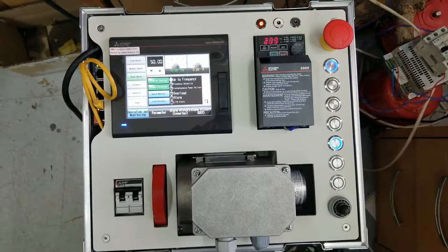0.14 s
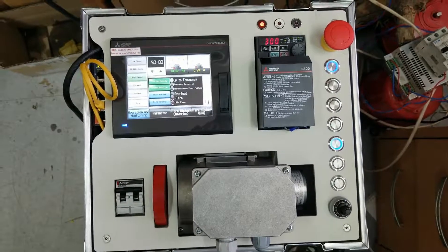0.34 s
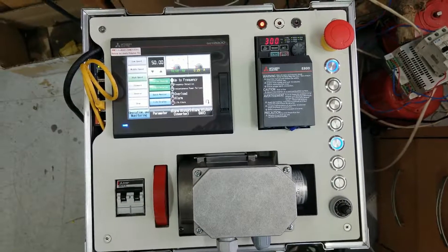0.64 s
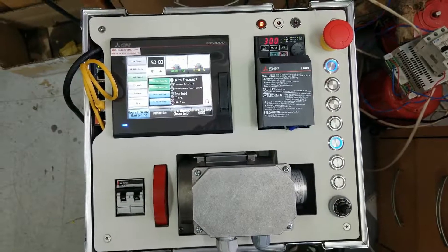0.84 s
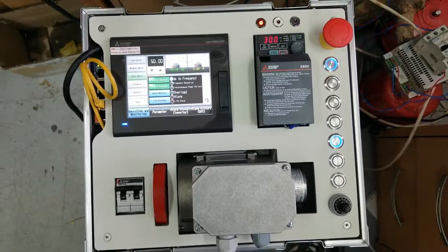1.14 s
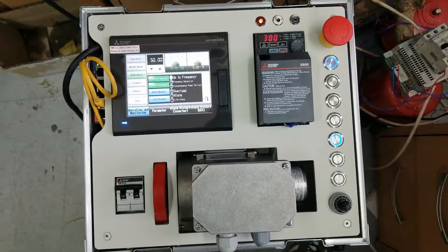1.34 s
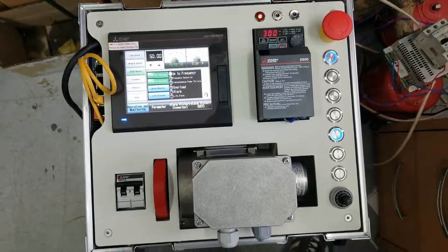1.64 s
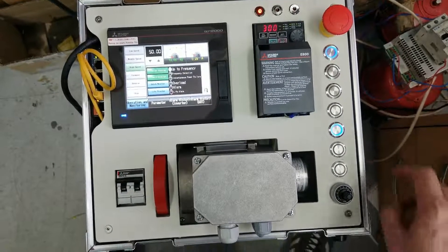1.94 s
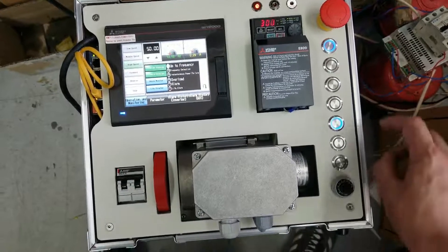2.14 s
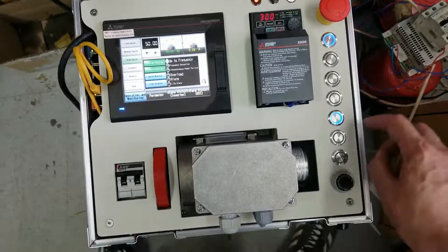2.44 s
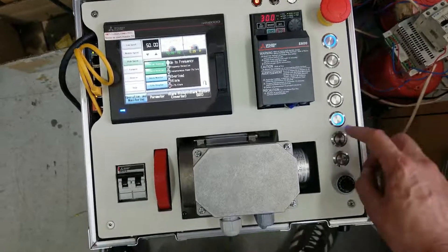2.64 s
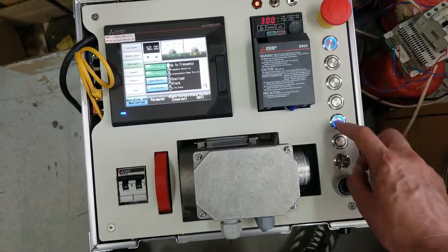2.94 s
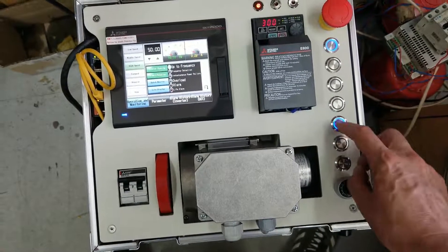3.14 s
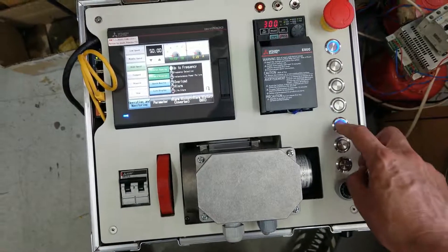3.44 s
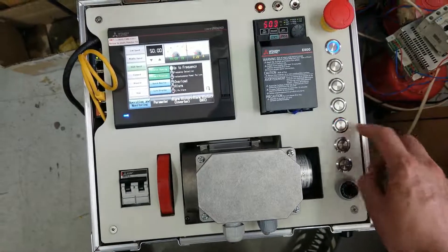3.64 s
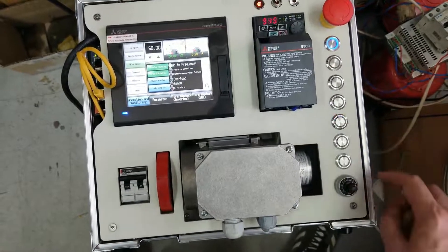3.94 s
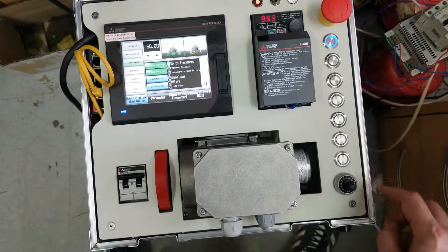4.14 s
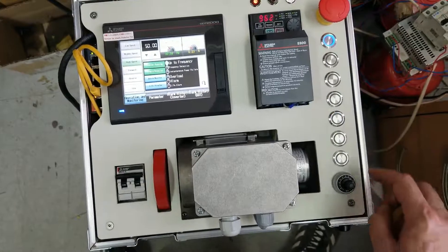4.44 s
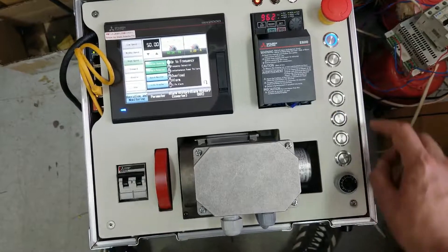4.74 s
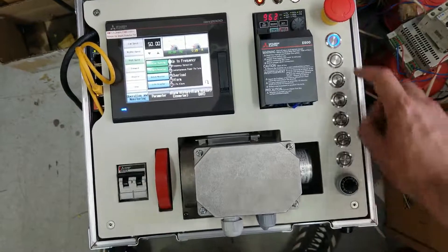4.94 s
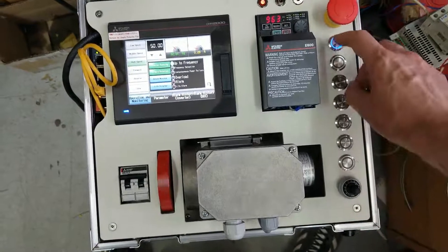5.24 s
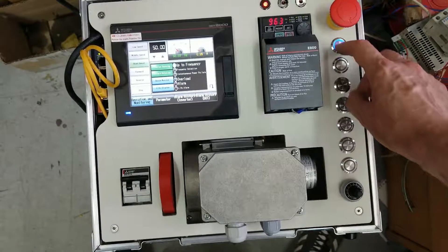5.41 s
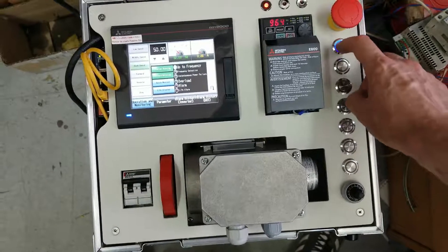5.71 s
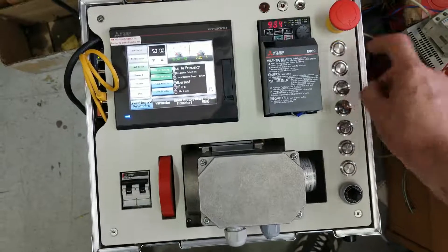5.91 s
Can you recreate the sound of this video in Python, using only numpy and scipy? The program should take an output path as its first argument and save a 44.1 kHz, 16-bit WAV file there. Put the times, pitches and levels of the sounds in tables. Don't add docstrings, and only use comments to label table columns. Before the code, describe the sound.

From 0 to 3.4 seconds a small motor turns slowly in a quiet workshop. Its shaft seal gives thin, high squeaks and a dry scrape about five times a second, fading as the phone drifts away and returning near 2.6 to 3 seconds. A faint electronic whistle grows clearer after 1.5 seconds. Soft low hand bumps and a small creak come mostly in the first second. At 3.43 a bright button snap sounds, followed by two hollow case knocks. The motor instantly runs three times faster: a fluttering metallic squeal, rubbing hiss, low hum and strong, very high whine, steady but swaying slightly, with more handling bumps around 4 seconds. At 5.71 a second click cuts the whine; the squeal drops away within about 0.15 seconds with faint knocks and a grip creak. A thin idle whistle and room hush remain to 6 seconds.

```python
import sys
import numpy as np
from scipy import signal
from scipy.fft import rfft, irfft, next_fast_len
from scipy.io import wavfile
from scipy.ndimage import uniform_filter1d

SR = 44100
rng = np.random.default_rng(int(sys.argv[2]) if len(sys.argv) > 2 else 0)


def how_loud(loudness_db):
    steps = np.asarray(loudness_db, float) / 20
    return 10 ** steps


def transcribe(u):
    v = np.clip(np.atleast_2d(u).T, -1, 1)
    q = np.round(v * 32767).astype(np.int16)
    wavfile.write(sys.argv[1], SR, q)


N = 267731
T = np.arange(N) / SR
START_S, STOP_S = 3.431, 5.712
STEP = 16
C = np.arange(N // STEP + 2) * STEP / SR
SIZE = next_fast_len(N)
HZ = np.maximum(np.arange(SIZE // 2 + 1) * SR / SIZE, 1)


def fine(x):
    ramp = np.arange(STEP) / STEP
    joined = x[..., :-1, None] + np.diff(x)[..., None] * ramp
    return joined.reshape(*x.shape[:-1], -1)


def walk(rate):
    k = int(SR / STEP / rate)
    held = np.repeat(rng.standard_normal(len(C) // k + 1), k)
    return 1.3 * uniform_filter1d(uniform_filter1d(held, k), k)[:len(C)]


def curve(table, before=-120, after=-120, edge_s=0.019):
    s, db = np.transpose(table)
    return np.interp(C, [s[0] - edge_s, *s, s[-1] + edge_s], [before, *db, after])


def over_hz(table):
    hz, value = np.transpose(table)
    return np.interp(np.log(HZ), np.log(hz), value)


def swells(rows, floor_db):
    power = sum(how_loud(db) ** 2 * np.exp(-((C - s) / half) ** 2) for s, db, half in rows)
    return fine(np.sqrt(how_loud(floor_db) ** 2 + power))[:N]


def noise(colour, flicker_db, lo_hz=0, hi_hz=SR, peaks=()):
    # f/Hz, likeness/0-1
    likeness = [(30, 0.7), (130, 0.62), (300, 0.92), (700, 0.51), (1400, 0.61), (3100, 0.22), (7000, 0.25),
                (15000, 0.04)]
    # f/Hz, level/dB
    louder_left = [(60, -2.5), (110, -4), (200, -4.5), (380, -10), (700, -10), (1290, -6.5), (2380, -2.5),
                   (4400, -10.5), (8120, -3.5), (15000, 2)]
    # f/Hz, phase/rad
    rub_lead = [(300, 0.34), (2400, -1.2), (4800, -1), (7200, -3), (10000, 0), (13000, -1.5)]
    same, a, b = rfft(rng.standard_normal((3, SIZE)))
    alike = np.clip(over_hz(likeness), 0, 1)
    shared, apart = np.sqrt(alike) * same, np.sqrt(1 - alike)
    left, lead = how_loud(over_hz(louder_left) / 2), np.exp(.5j * over_hz(rub_lead))
    ports = np.array([(shared * lead + apart * a) * left, (shared / lead + apart * b) / left])
    peak_db = sum(db / (1 + (2 * (HZ - hz) / w) ** 2) for hz, w, db in peaks)
    ports = ports * how_loud(over_hz(colour) + peak_db)
    inside = (HZ > lo_hz) & (HZ < hi_hz)
    ports = ports / np.sqrt(2 * np.sum(abs(ports.mean(0)[inside]) ** 2)) * SIZE
    band_place = np.log2(HZ / 30) / 2
    out = 0
    for k in range(6):
        band = np.cos(np.pi / 2 * np.clip(band_place - k, -1, 1)) ** 2
        out = out + irfft(ports * band, SIZE)[:, :N] * fine(how_loud(flicker_db * walk(12)))[:N]
    return out


def add(out, size, phase, left_db, lead):
    on = np.flatnonzero(size)
    span, left = slice(on[0], on[-1] + 1), how_loud(left_db / 2)
    level = fine(np.array([size * left, size / left])[:, span])
    angle = fine(np.array([phase + lead / 2, phase - lead / 2])[:, span])
    out[:, on[0] * STEP:on[-1] * STEP] += level * np.cos(angle)


def squeak(rows, angle, gain, seal_left, wander_hz, flutter_db, flutter_rate, turn_db):
    # f/Hz, phase/rad
    left_lead = [(300, -0.5), (1200, 0.43), (2400, -0.94), (4800, -2), (7200, -2.5), (12000, -3)]
    out = np.zeros((2, len(C) * STEP))
    for hz, glide, start, length, db in rows:
        u = np.clip((angle - start) % 1 / length, 0, 1)
        turn = rng.standard_normal(128)[np.floor(angle - start).astype(int) % 128]
        grip = np.sin(np.pi * u ** 0.73) * how_loud(db + turn_db * turn + flutter_db * walk(flutter_rate))
        wander = wander_hz * (1 + 25 * abs(glide)) * np.sqrt(hz / 2400) * walk(flutter_rate)
        pitch = hz * (1 + glide * (u - .5)) + wander
        phase = 2 * np.pi * np.cumsum(pitch) * STEP / SR
        lead = np.interp(hz, *np.transpose(left_lead)) + 0.71 * walk(4.01)
        add(out, gain * grip, phase, np.interp(hz, *np.transpose(seal_left)), lead)
    return out[:, :N]


def lines(table, gain, sway_db, left_db, lead):
    out = np.zeros((2, len(C) * STEP))
    for hz, db in table:
        level = gain * np.sqrt(2) * how_loud(db + sway_db * walk(4.99))
        phase = 2 * np.pi * (hz * C + rng.random()) + 0.46 * walk(14)
        add(out, level, phase, left_db + 2 * walk(2.83), lead + 0.28 * walk(1.76))
    return out[:, :N]


def sidebands(rows, drive_hz):
    carrier_hz = 10000.2
    return [(carrier_hz + round(k) * drive_hz, db) for k, db in rows]


def room_tone():
    # f/Hz, level/dB per Hz
    room_colour = [(53, -51), (90, -28), (201, -9), (278, -35), (393, -8.5), (753, -17), (1110, -18),
                   (1210, -14), (3200, -33.5), (7330, -51.5), (9720, -40), (12000, -30.5), (16000, -30)]
    return how_loud(-72) * noise(room_colour, flicker_db=0.5)


def hand():
    # t/s, level/dB, half length/s
    jolts = [(.18, -51, 0.064), (.33, -57.5, 0.04), (.54, -55.5, 0.046), (.76, -63, 0.028),
             (.96, -62, 0.051), (1.57, -71, 0.03), (2.26, -64, 0.063), (2.56, -65, 0.089), (3.0, -63, .08),
             (3.51, -54, 0.036), (3.85, -59.5, 0.035), (4.0, -48, 0.022), (4.08, -51.5, 0.034),
             (4.33, -54.5, 0.076), (4.75, -62, 0.078), (5.05, -63, 0.067), (5.74, -55, 0.071)]
    # t/s, level/dB, half length/s
    creaks = [
        (.02, -58.5, .05),
        (.54, -67, 0.046),
        (3.52, -62, 0.032),
        (5.76, -57, 0.07),
        (6.0, -68, 0.087),
    ]
    # f/Hz, level/dB per Hz
    rumble_colour = [(15, -36), (35, -1.5), (58, -2.5), (100, -9.5), (200, -35), (400, -33.5), (3000, -38)]
    creak_colour = [(60, -25), (110, -5.5), (150, -9.5), (205, -0.5), (260, -8.5), (450, -20.5),
                    (2300, -24), (4000, -44)]
    between_creaks_db = np.where(C < START_S, -79, -71)
    rumble = swells(jolts, floor_db=-69.5) * noise(rumble_colour, flicker_db=5.5)
    return rumble + swells(creaks, between_creaks_db) * noise(creak_colour, flicker_db=1.0)


def slow_motor():
    # f/Hz, glide/share, start/turns, length/turns, level/dB
    squeaks = [(2401, 0.003, -0.033, 0.28, -1.5), (2456, -0.024, 0.1728, 0.1314, -3.5),
               (2367, 0.0035, 0.27, 0.193, -4), (4794, .01, -0.0423, .25, -4),
               (4897, -0.041, 0.1676, 0.144, -4.5), (4790, 0.0067, 0.28, 0.23, -11),
               (7190, -0.023, 0.014, 0.22, -6.5), (7070, -0.053, 0.2585, 0.21, -11),
               (3607, -0.028, -0.046, .15, -17.5), (1186, 0, -0.045, 0.15, -18.5),
               (5860, -.04, -0.051, 0.14, -14.5), (9850, -0.037, 0.57, 0.285, -21),
               (2060, -.06, .47, 0.11, -12.5), (1528, -0.06, .52, 0.15, -13.5),
               (1304, -.05, 0.609, .16, -14), (1270, .07, .73, .15, -13.5),
               (2777, -0.053, 0.744, .17, -15.5), (2105, -0.0053, 0.97, 0.21, -22),
               (12000, -.02, .02, .3, -13), (14450, -.01, 0.022, .2, -19)]
    # t/s, level/dB
    drift = [
        (0, -56.5),
        (.5, -62),
        (1.2, -64),
        (2.6, -60),
        (3.0, -58.5),
        (3.43, -65),
    ]
    # f/Hz, left minus right/dB
    seal_left = [(1200, -11), (1500, -5), (2400, 1), (2760, -4.5), (3600, -17), (4800, -5.5), (7100, -9),
                 (9670, 1)]
    # f/Hz, level/dB per Hz
    rub_colour = [(88, -30), (150, -12), (730, -16), (1190, -10), (1720, -18), (2400, -9), (3100, -21),
                  (4760, -18), (5680, -19.5), (7320, -17), (8070, -36), (9820, -12.5), (10600, -24),
                  (12200, -18), (16000, -22.5)]
    # multiple of drive frequency, level/dB
    whistle_rows = [(-7, -85), (-5, -79.5), (-1, -72), (1, -73), (5, -75.5)]
    spot_s, turns_per_s = 0.162, 5.0
    angle, on = (C - spot_s) * turns_per_s, C < START_S
    arrive = 1.73 * np.exp(-((angle + .05) % 1) / 0.16)
    leave = 0.28 * np.exp(-((angle - .47) % 1) / 0.046)
    scrape_peaks = [(12150, 670, 15.3), (6330, 1300, 5.9), (14400, 800, 6)]  # f/Hz, width/Hz, level/dB
    hiss = noise(rub_colour, flicker_db=1.2)
    hiss = hiss + fine(arrive + leave)[:N] * noise(rub_colour, flicker_db=3.0, peaks=scrape_peaks)
    squeak_gain = on * how_loud(np.interp(C, *np.transpose(drift)) + 11)
    tones = squeak(squeaks, angle, squeak_gain, seal_left,
                   wander_hz=24, flutter_db=3.5, flutter_rate=80, turn_db=1.93)
    whistle_db = np.interp(C, [1.2, 1.73], [-71, -64.5])
    whistle = lines(sidebands(whistle_rows, drive_hz=10.4), on * how_loud(whistle_db + 70),
                    sway_db=-0.2, left_db=6.5, lead=-1.94)
    return tones + whistle + (T < START_S) * how_loud(-64) * hiss


def snaps():
    # t/s, level/dB, time to fall 60 dB/s
    contacts = [
        (3.4307, -32, 0.07),
        (3.4321, -27.5, 0.0646),
        (3.436, -36, 0.01),
        (5.7121, -30, 0.0325),
        (5.7143, -29, 0.0739),
        (5.7165, -48, 0.25),
    ]
    # f/Hz, width/Hz, level/dB
    on_cap = [(2512, 600, -6), (4600, 550, 4), (7400, 437, 3.5), (10500, 190, -6), (10800, 280, -1.5),
              (11850, 340, -5), (13700, 200, -3), (15130, 200, 3)]
    off_cap = [(4710, 1100, -3.5), (5600, 110, 3), (7600, 200, -18), (9030, 140, -2), (10200, 90, -25.5),
               (12700, 150, -20), (14700, 99, -15), (15700, 78, -12)]
    out = 0
    for (s, db, t60), peaks in zip(contacts, 3 * [on_cap] + 3 * [off_cap]):
        colour = how_loud(-12) * (HZ > 1200) * np.minimum(HZ / 3500, 1)
        colour = colour + sum(how_loud(g) / np.sqrt(1 + ((HZ - hz) / (1.6 * w)) ** 4) for hz, w, g in peaks)
        same, own = rng.standard_normal(SIZE), rng.standard_normal((2, SIZE))
        rattle = irfft(rfft(same + 1.6 * own) * colour, SIZE)[:, :N]
        fade = (T > s) * 1000. ** (-np.maximum(T - s, 0) / t60)
        out = out + how_loud(db) * rattle / rattle.std() * fade
    return out


def knocks():
    # t/s, level/dB, push/ms
    blows = [
        (3.4426, -28.5, 2.8),
        (3.5022, -32, 2.2),
        (5.72, -49, 0.66),
        (5.7440, -53, 1.5),
    ]
    # f/Hz, level/dB, time to fall 60 dB/s
    blow_modes = [(384.4, -3, 0.147), (465.3, -3, 0.163), (531.6, -4, 0.125), (695.4, -6, 0.0538),
                  (877, -1.5, 0.066), (1134, 3, 0.0436), (1210, -1.5, 0.0394), (1425, -7, 0.026)]
    rebound_modes = [(205, -6.5, .2), (334, 2.5, .12), (395, -3, .1), (463, -4.5, .2), (530, -7, .14),
                     (786, -15, .1), (1300, -14, .04)]
    # f/Hz, level/dB per Hz
    thud_colour = [(170, -45), (300, 0), (450, -1), (900, -12), (2000, -30)]
    out, t = np.zeros(N + SR), T[:SR // 4]
    thud = noise(thud_colour, flicker_db=2.0)[0]
    for (s, db, push_ms), modes, way in zip(blows, 2 * (blow_modes, rebound_modes), 2 * (1, -1)):
        at = int(s * SR)
        ring = sum(how_loud(g) * np.sin(2 * np.pi * hz * t) * 1000. ** (-t / t60) for hz, g, t60 in modes)
        ring = ring + how_loud(-7) * thud[at:at + len(t)] * 1000. ** (-t / 0.11)
        push = 1 - np.exp(-t / (push_ms / 1000))
        out[at:at + len(t)] += way * how_loud(db + 4.5) * ring * push
    return out[:N] * how_loud(np.array([[-3.2], [3.2]]))


def fast_motor():
    # f/Hz, glide/share, start/turns, length/turns, level/dB
    squeals = [(2696, -.07, -0.24, .37, -3.5), (2458, -0.029, -0.045, .4, 1),
               (1193, .04, -0.045, .42, -2.5), (1189, -.03, 0.36, 0.43, -15),
               (1217, -.1, -0.27, 0.22, -12.5), (3940, -0.07, -0.19, 0.46, -17),
               (5370, -.04, -0.33, 0.13, -11), (12800, -0.01, 0.11, 0.17, -12)]
    overtone = [(4854, -.03, 0.076, 0.3405, 1.8)]
    high_whistle = [(6595, 0.0014, -0.16, 0.505, 3.2)]
    # t/s, towards overtone/dB
    tipping = [(3.5, -2), (3.7, 7), (3.9, 1.5), (4.3, -0.5), (4.5, 7.5), (4.75, 0), (5.3, 4.5), (5.55, .2)]
    # f/Hz, left minus right/dB
    seal_left = [(1200, 3), (2600, 1.2), (3930, -1), (4850, -12), (5530, 12), (6600, 3), (12360, 10)]
    # f/Hz, level/dB per Hz
    rub_colour = [(71, -37), (120, -25.5), (295, -17), (355, -12.5), (684, -18.5), (1190, -2.5),
                  (1720, -19.5), (2750, -7), (3110, -34), (3590, -15), (4500, -25), (4980, -15.5),
                  (8310, -20.5), (10200, -10), (16000, -28)]
    # f/Hz, width/Hz, level over the hiss/dB
    housing = [(358, 24, 6.5), (467.7, 48, 8), (530, 42, 6), (1175, 100, 4), (2650, 210, 2),
               (7160, 154, 13.5), (10200, 840, 1), (12230, 390, 8.5)]
    # f/Hz, level/dB
    hum_rows = [(355.3, -63), (463.0, -75), (527.6, -73)]
    # t/s, level/dB
    whine_level = [(3.45, -53.5), (3.56, -49.5), (3.8, -48.5), (4.2, -47), (4.45, -49.5), (4.93, -47),
                   (5.17, -51.5), (5.45, -48), (5.7, -53)]
    # multiple of drive frequency, level/dB
    near_rows = [(-5, -56.5), (-3, -75), (-1, -57), (1, -51.5), (3, -76), (5, -56.5)]
    far_trend = [(-21, -85), (-14, -73), (-5, -72), (3, -77), (18, -64.5), (27, -62.5), (32, -70.5)]
    spot_s, turns_per_s = 3.8161, 16.06
    speed = turns_per_s * np.clip(1 - (C - STOP_S) / 0.154, 0, 1)
    angle = np.cumsum(speed) * STEP / SR - spot_s * turns_per_s
    running = (C > START_S + .03) * how_loud(-1350 * np.maximum(C - STOP_S, 0) ** 2)
    age = np.maximum(C - START_S, 0)
    bite_db = -1.5 * np.exp(-age / 0.11)
    tip_db = np.interp(C, *np.transpose(tipping))
    squeal_db = -52 - 2 * age + bite_db
    upper_db = -59 - 0.9 * age + 2.6 * bite_db
    tones = 0
    for db, rows in ((squeal_db, squeals), (upper_db + tip_db, overtone), (upper_db - tip_db, high_whistle)):
        tones = tones + squeak(rows, angle, running * how_loud(db + 8), seal_left,
                               wander_hz=22.04, flutter_db=3.0, flutter_rate=150, turn_db=1.0)
    throb = fine(running * how_loud(3.8 * np.cos(2 * np.pi * (angle - .1))))[:N]
    hiss = noise(rub_colour, flicker_db=1.63, lo_hz=397.0, hi_hz=996.0, peaks=housing)
    rubbing = how_loud(-61 - 1.0) * throb * hiss
    hum = lines(hum_rows, running, sway_db=2.0, left_db=-5.0, lead=-.1)
    far_rows = []
    for k in range(-23, 36):
        if abs(k) > 6 and k % 6 in (1, 5):
            lift_db = 2.5 if k % 6 == 5 else -2.5
            far_rows.append((k, np.interp(k, *np.transpose(far_trend)) + lift_db))
    powered = abs(C - (START_S + STOP_S) / 2) < (STOP_S - START_S) / 2
    whine = lines(sidebands(near_rows + far_rows, drive_hz=32.39), powered * how_loud(curve(whine_level) + 50.5),
                  sway_db=0.05, left_db=6, lead=-1.52)
    return tones + rubbing + hum + whine


def idle_whistle():
    # f/Hz, level/dB
    idle_rows = [(9900, -84), (9997, -74), (10099, -70)]
    return lines(idle_rows, C > STOP_S + .1, sway_db=0.0, left_db=2, lead=-2.05)


def workshop(x, wet_db=-14, t60=0.24):
    t = T[:SR // 2]
    tail = uniform_filter1d(rng.standard_normal((2, len(t))), size=3) * 1000. ** (-t / t60) * (t > .004)
    tail = tail / np.sqrt(np.sum(tail[0] ** 2))
    return x + how_loud(wet_db) * signal.fftconvolve(x, tail, axes=1)[:, :N]


def scene():
    machine = slow_motor() + snaps() + knocks() + fast_motor()
    return workshop(machine) + room_tone() + hand() + idle_whistle()


def top_cut(x):
    return signal.sosfilt(signal.butter(12, 16980, fs=SR, output="sos"), x)


def record(dry):
    notches = ((3115, 107, 0.8), (5720, 90, 0.62), (8510, 680, 0.56), (10850, 170, 0.42))  # f/Hz, width/Hz, depth
    dips = np.prod([1 - depth / (1 + ((HZ - hz) / width) ** 4) for hz, width, depth in notches], axis=0)
    top_hz = 15830
    mix = irfft(rfft(dry, SIZE) * dips * (HZ < top_hz), SIZE)[:, :N]
    return top_cut(mix)


dry = scene()
out = record(dry)
transcribe(out)
```